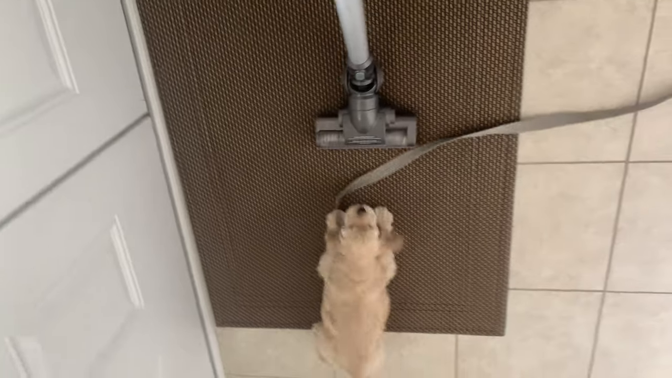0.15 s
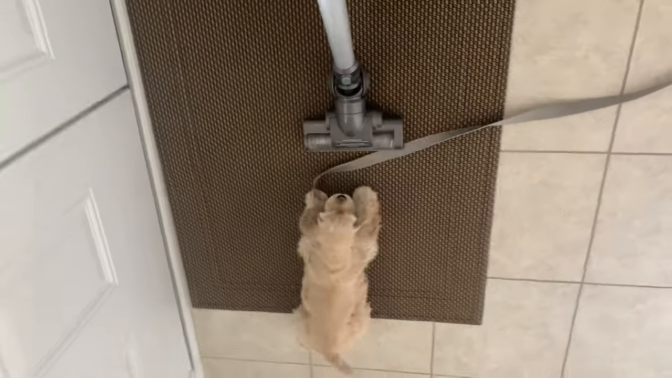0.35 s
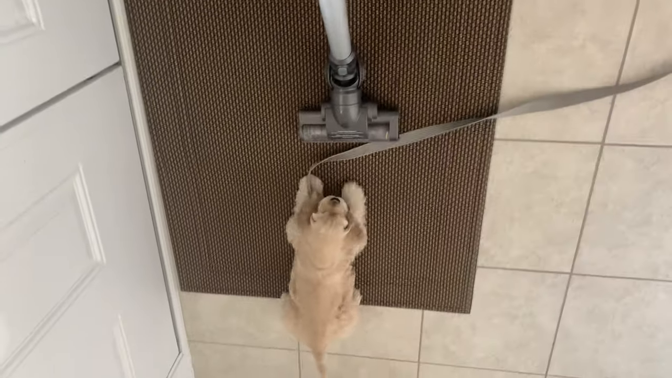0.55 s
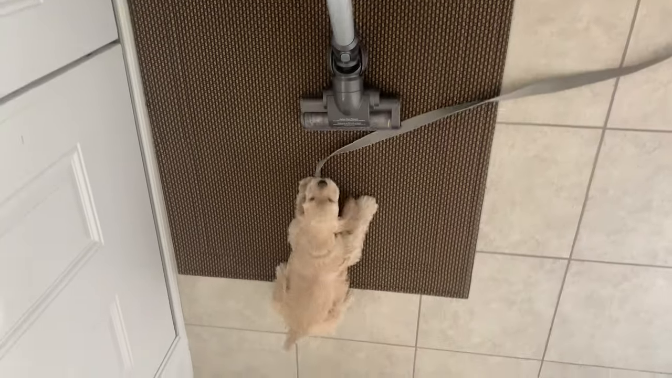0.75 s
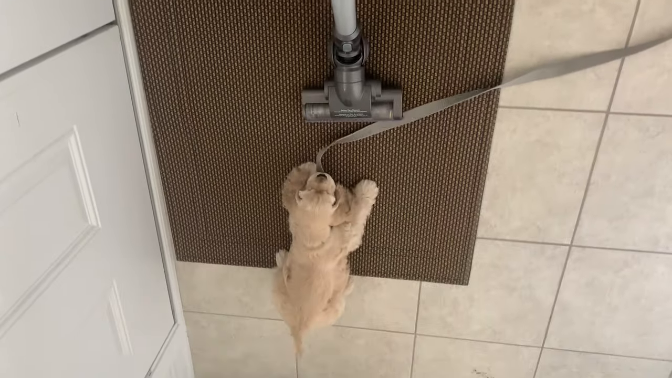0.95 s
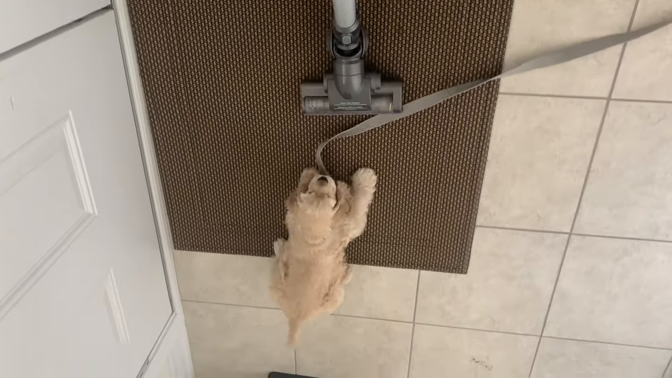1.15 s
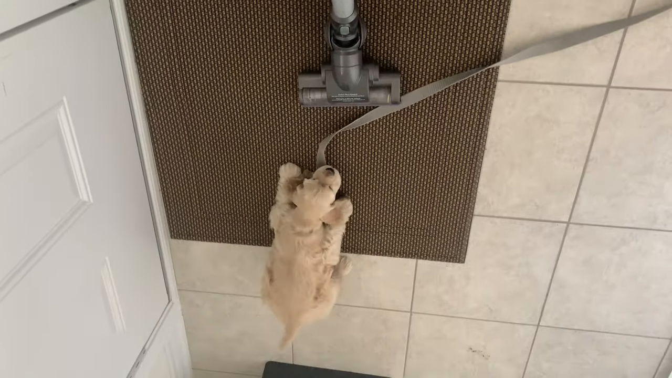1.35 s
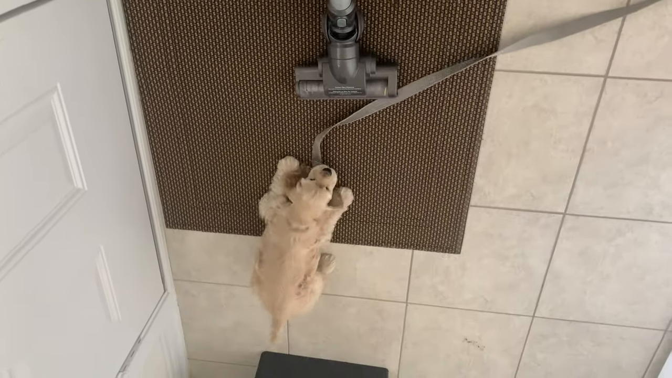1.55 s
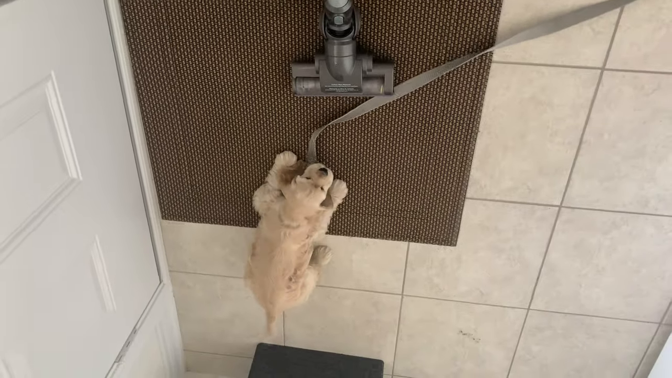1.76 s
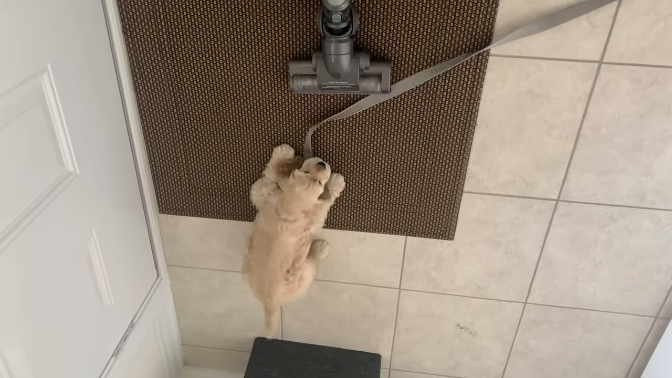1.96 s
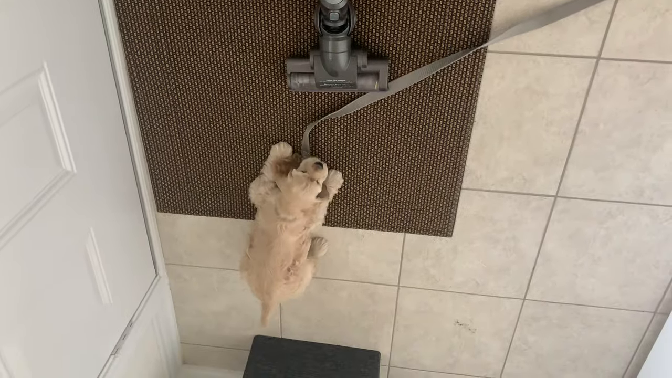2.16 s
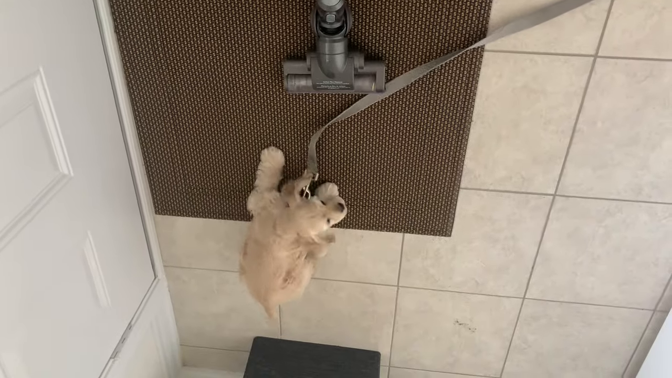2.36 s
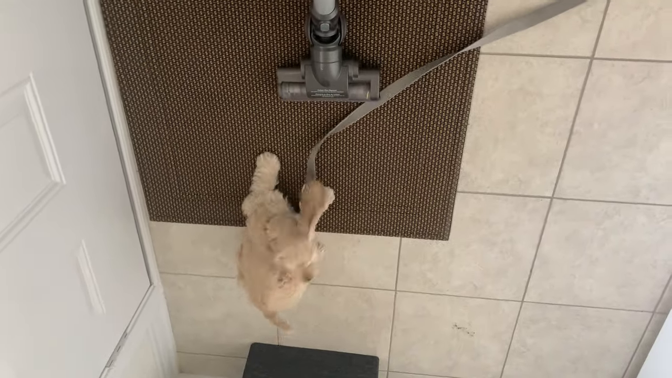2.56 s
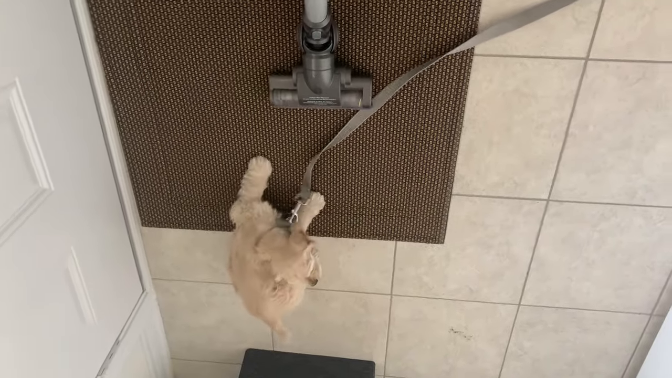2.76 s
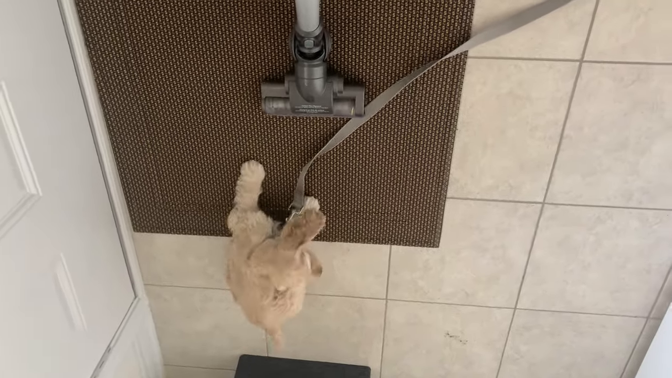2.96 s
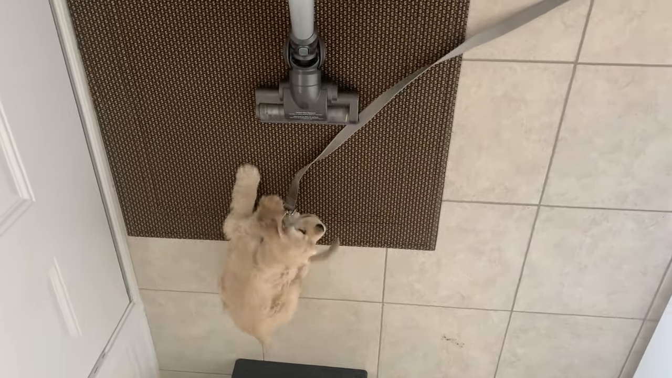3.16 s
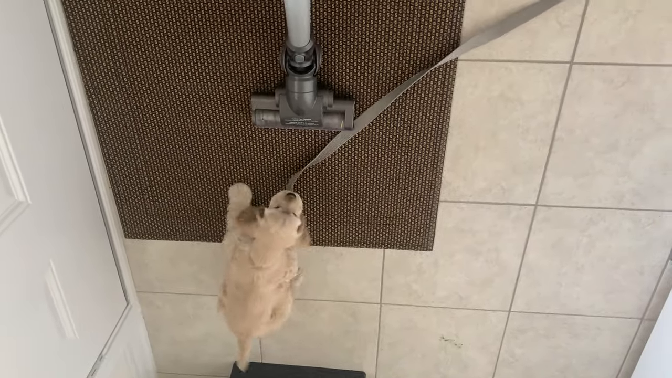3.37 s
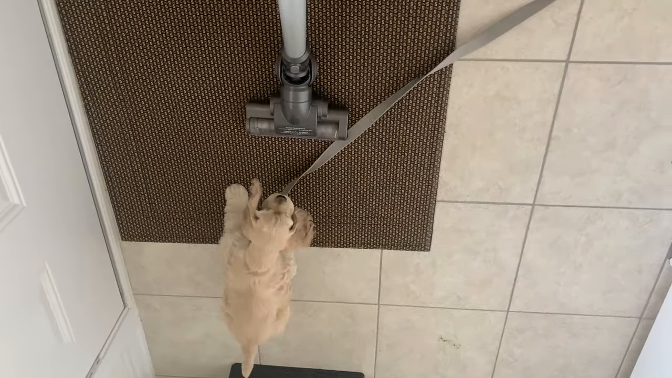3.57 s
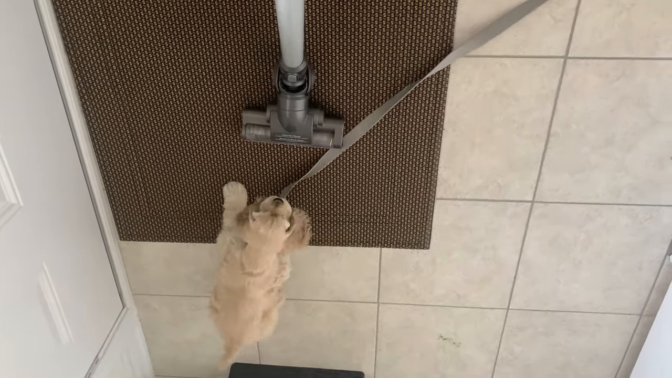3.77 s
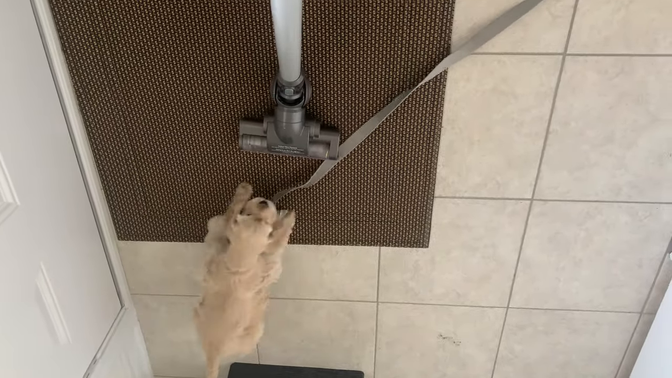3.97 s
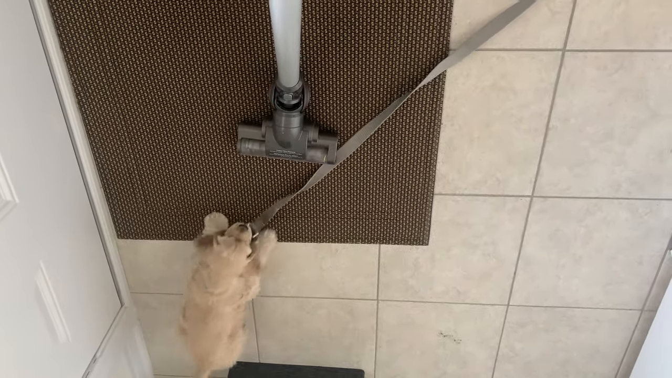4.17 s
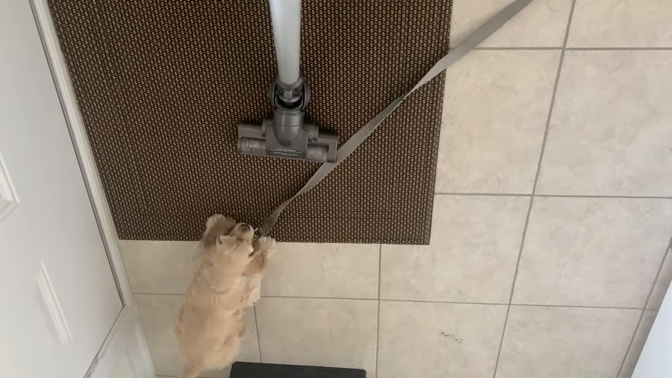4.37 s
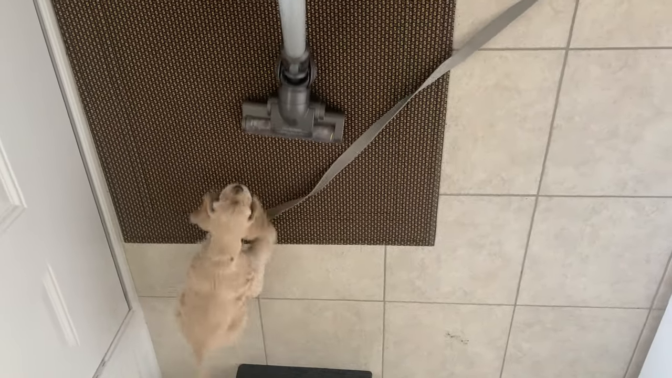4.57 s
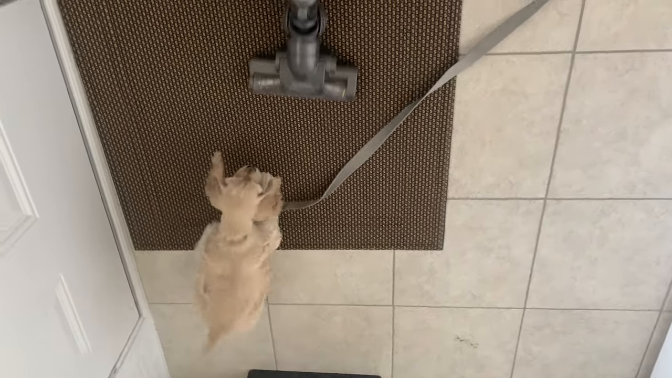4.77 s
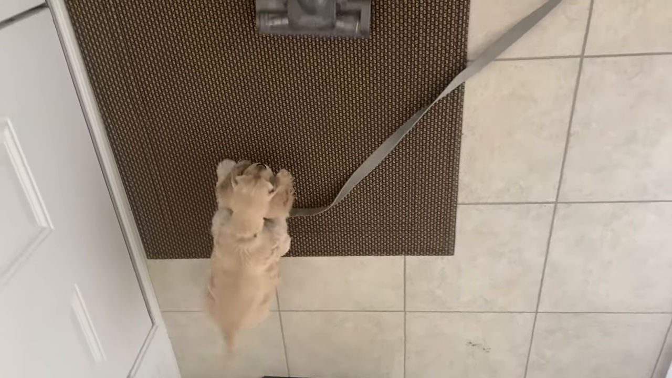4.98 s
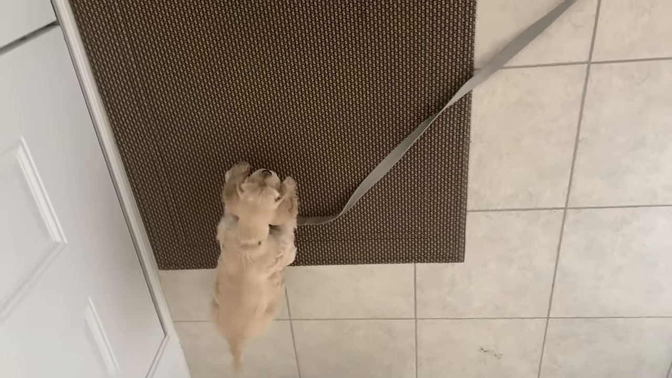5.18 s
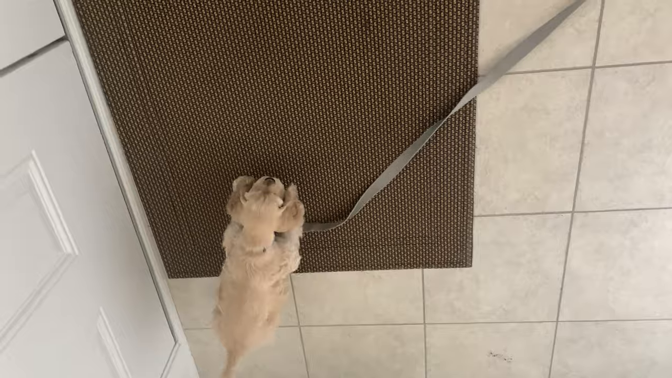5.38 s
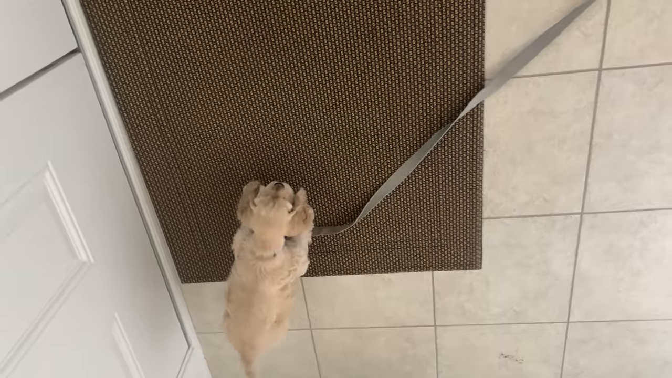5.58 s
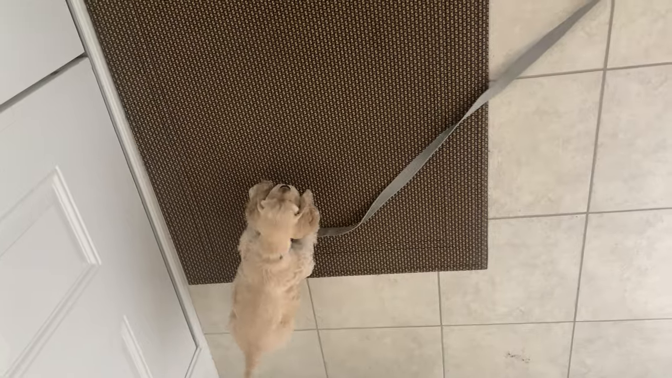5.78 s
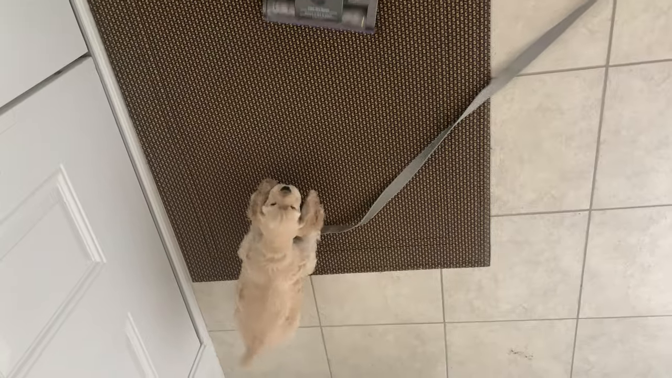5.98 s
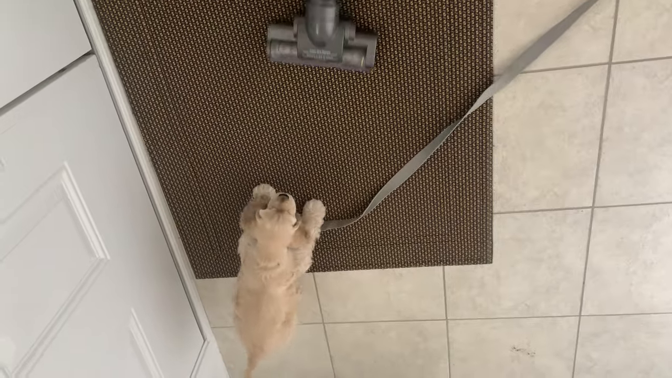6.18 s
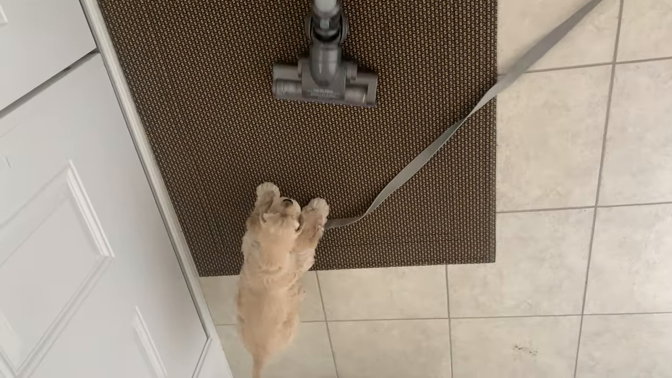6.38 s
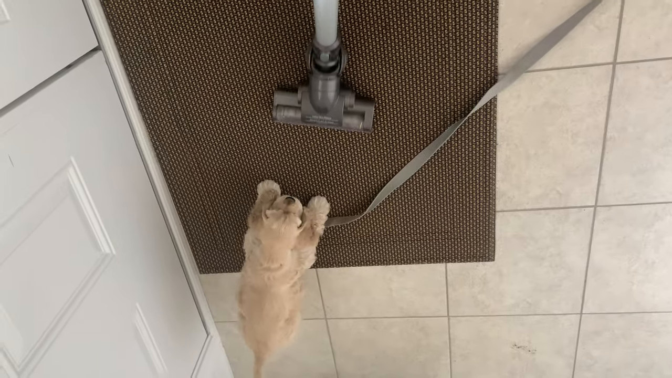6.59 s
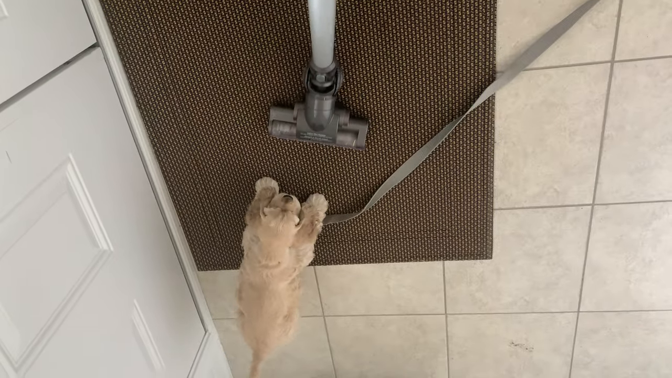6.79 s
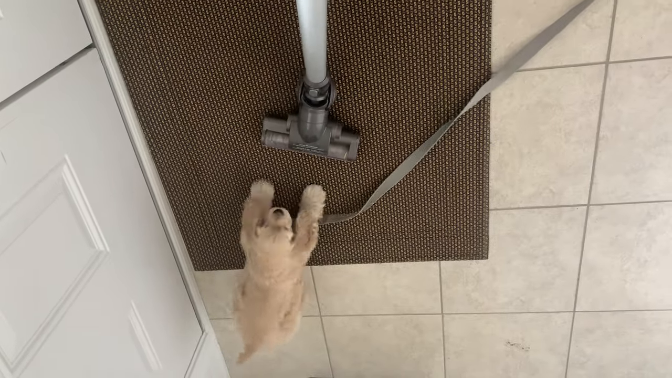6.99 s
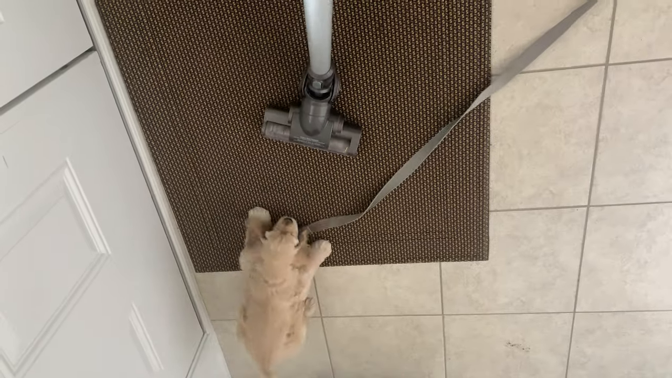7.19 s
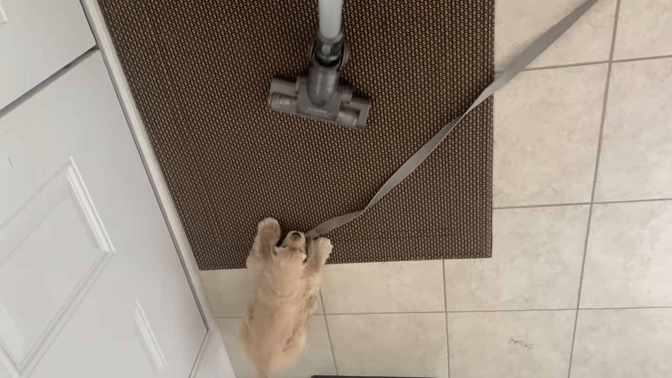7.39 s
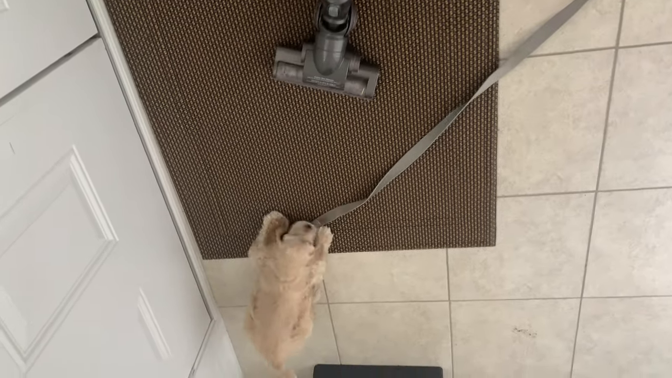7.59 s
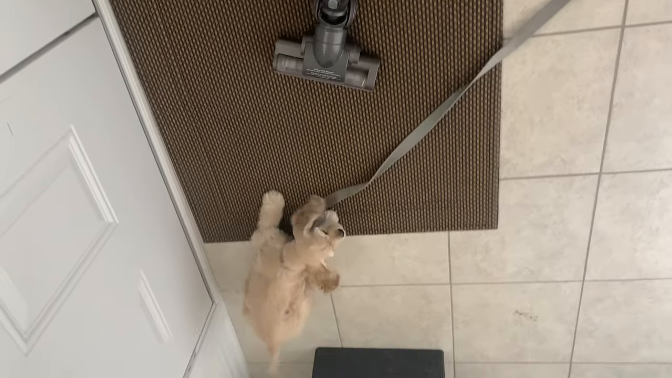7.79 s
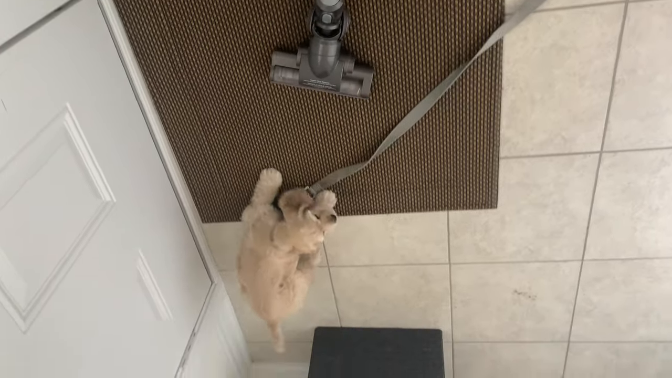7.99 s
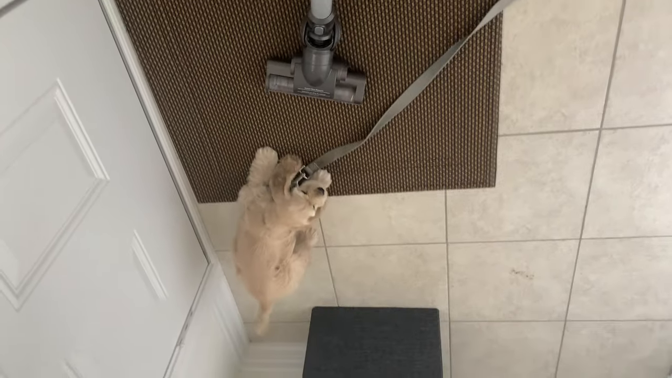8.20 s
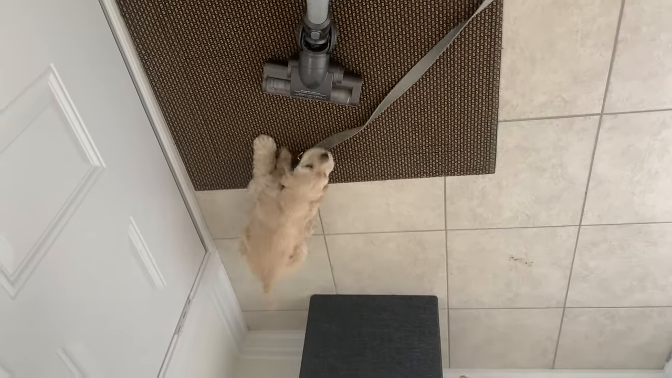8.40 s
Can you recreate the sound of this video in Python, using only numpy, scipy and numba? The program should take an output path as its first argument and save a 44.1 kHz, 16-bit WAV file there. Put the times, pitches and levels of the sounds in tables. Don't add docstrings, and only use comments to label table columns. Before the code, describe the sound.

From start to end a vacuum cleaner runs in a small, hard tiled hallway: a broad turbulent roar with strong bright hiss, a thin steady motor whine near 1.1 kHz with fainter overtones, a lower brush hum and slight wheel rumble. Its level wavers, strongest around 4 to 4.5 s, dropping near 4.8 and 5.5 s, swelling again at 7 s, dipping by 7.8 s, then rising. Over it a puppy gives single hoarse yaps, each under about 0.2 s, rising quickly to about 1 kHz and falling, with raspy breath and a short bright echo. They come at about 0.2, 0.75, 1.3, 2.3, 3.2, 3.9 and 4.5 s, then a pause with only the cleaner, then 6.0, 7.05, 7.7 and a last, cut-off one at 8.4 s. Phone microphone, stereo, mildly compressed on barks.

```python
import sys
import numpy as np
from scipy import signal
from scipy.fft import rfft, irfft
from scipy.io import wavfile
from scipy.ndimage import uniform_filter1d
from numba import njit

SR = 44100
rng = np.random.default_rng(int(sys.argv[2]) if len(sys.argv) > 2 else 0)


def to_wav(s):
    ch = np.atleast_2d(s).T
    pcm = np.round(np.clip(ch, -1, 1) * 32767)
    wavfile.write(sys.argv[1], SR, pcm.astype(np.int16))


def rack_gain(trim_db):
    fader = np.asarray(trim_db, float)
    return 10 ** (fader / 20)


N = 372204
TIME = np.arange(N) / SR
HZ = np.fft.rfftfreq(N, 1 / SR)
MIDDLE_DB = -36


def over_hz(table):
    hz, value = np.transpose(table)
    return np.interp(np.log(HZ + 1), np.log(hz), value)


def unit(x):
    return x / np.sqrt(np.mean(x ** 2))


def walk(rate):
    hold = int(SR / rate)
    steps = np.repeat(rng.standard_normal(N // hold + 1), hold)
    return unit(uniform_filter1d(uniform_filter1d(steps, hold), hold)[:N])


@njit
def band(x, hz, width):
    y, b, l = np.empty(len(x)), 0., 0.
    for i in range(len(x)):
        g, k = np.tan(np.pi * hz[i] / SR), width / hz[i]
        v = (b + g * (x[i] - l)) / (1 + g * (g + k))
        b, l, y[i] = 2 * v - b, l + 2 * g * v, k * v
    return y


def twice(x, hz, width_hz):
    centre_hz = hz + np.zeros(N)
    return band(band(x, centre_hz, 1. * width_hz), centre_hz, 1. * width_hz)


def nearness():
    # (time [s], jet hiss level [dB], nozzle turned to the phone [dB])
    path = [(0.0, -38, 0.7), (0.65, -36, 1.3), (0.94, -39, -0.5), (1.08, -35.5, 0.3), (1.69, -37, 0.1),
            (3.69, -34.5, -0.8), (4.18, -33.5, 0.3), (4.47, -33, -1), (4.79, -40, 1), (4.84, -36.5, -2.5),
            (5.55, -40, -4.6), (7.08, -33.5, 0.6), (7.76, -38.5, 2.2), (8.44, -35, -2.5)]
    s, hiss_db, turn_db = np.transpose(path)
    return np.interp(TIME, s, hiss_db) - MIDDLE_DB, np.interp(TIME, s, turn_db)


def air(levels_db):
    # (frequency [Hz], density [dB per Hz])
    flow_spectrum = [(25, -50), (80, -51), (130, -14), (210, -4.5), (300, -4.5), (400, 0.5), (520, -2.5),
                     (800, 1), (1300, 1.5), (2000, 0), (2700, 2), (3350, 5.5), (3800, 0.5), (4250, -7),
                     (4700, -7), (5400, 4.5), (6400, -1.5), (7300, -5), (8200, -1.5), (9100, 2), (10200, -2),
                (11500, -7.5), (12300, -5.5), (13500, -5), (15000, -9.5), (16500, -13)]
    flicker_db, half_octave = 1.67, np.log(2) / 2
    centres = np.log([280, 1400, 6300, 11000])
    spectrum = rfft(rng.standard_normal(N)) * rack_gain(over_hz(flow_spectrum))
    out = 0
    for place in np.log(40) + half_octave * np.arange(19):
        window = np.clip(1 - abs(np.log(HZ + 1) - place) / half_octave, 0, 1)
        share = [np.interp(place, centres, row) for row in np.eye(4)]
        band_db = np.dot(share, levels_db) + flicker_db * walk(9)
        out = out + rack_gain(band_db) * irfft(spectrum * window, N)
    return out


def whine():
    # (time [s], whine fundamental [Hz])
    motor_speed = [
        (0, 1132.5),
        (3.9, 1132.5),
        (4.3, 1126),
        (5.6, 1127),
        (6.6, 1130),
        (7.0, 1132.5),
        (7.4, 1127),
        (8.44, 1128),
    ]
    # (multiple of the fundamental [1], level [dB])
    motor_orders = [(1, -50), (2, -57), (3, -60), (4, -59), (5, -56), (6, -59), (7, -54), (8, -55),
                    (9, -54), (12, -60), (13, -60)]
    # (frequency [Hz], level [dB])
    brush_partials = [
        (732, -50),
        (1462, -59),
        (2192, -62),
    ]
    # (time [s], motor hum level [dB], brush level [dB])
    facing = [
        (0, -6, -4),
        (1.4, -6, 1),
        (2.8, 4, 3),
        (4.4, 5, 1),
        (5.0, 0, -4),
        (5.85, 5, -5),
        (7.0, 3, -5),
        (8.44, -3, -6),
    ]
    s, *columns = np.transpose(facing)
    hum_db, brush_db = (np.interp(TIME, s, column) for column in columns)
    whistle_db = 3 + 0.95 * nearness()[0]
    motor_hz = np.interp(TIME, *np.transpose(motor_speed)) * (1 + .001 * walk(8))
    phase = 2 * np.pi * np.cumsum(motor_hz) / SR
    tones = np.zeros(N)
    for k, db in motor_orders:
        tone_db = db + (hum_db if k < 3 else whistle_db) + 2.5 * walk(4)
        tones = tones + rack_gain(tone_db) * np.sin(k * phase + 2 * np.pi * rng.random())
    for hz, db in brush_partials:
        tones = tones + rack_gain(db + brush_db + 2.5 * walk(4)) * np.sin(2 * np.pi * hz * TIME)
    return np.sqrt(2) * tones


def nozzle(near_db):
    slot_hz, width_hz = 7300, 1500
    return unit(twice(rng.standard_normal(N), slot_hz, width_hz)) * rack_gain(-44.5 + 3.8 * near_db)


def wheels():
    floor_hz, width_hz = 74, 130
    rumble = twice(twice(rng.standard_normal(N), floor_hz, width_hz), floor_hz, width_hz)
    bumps_per_s = 6
    return unit(rumble) * rack_gain(-62 + 2.5 * walk(bumps_per_s))


def yap_controls():
    # (start [s], rise [s], top pitch [Hz], throat level [dB], mouth level [dB])
    yap_table = [(.19, 0.02972, 927.4, -19.5, -18.5), (.742, .046, 985, -13.5, -24.5),
                 (1.28, .04, 951.2, -18.5, -18), (2.272, .04, 1124, -13.5, -18),
                 (3.222, .065, 1134, -17, -21), (3.91, .055, 1000, -19.5, -19),
                 (4.503, .042, 1122, -14.5, -22), (6.01, .052, 1149, -15.5, -21),
                 (7.04, .06, 1154, -15.5, -22), (7.672, .06, 1181, -12, -23),
                 (8.38, .07, 1124, -14.5, -18.5)]
    shoulder, jaw_open, knee, jaw_shuts = .55, .68, 1 + 0.25, 1 + 0.38
    out, voiced = np.zeros((6, N)), np.zeros(N)
    for k, (s, rise, top_hz, throat_db, mouth_db) in enumerate(yap_table):
        end = s + rise + .09 + .1 * (top_hz - 1000) / 1000
        stage = np.interp(TIME, [s, s + rise, end], [0, 1, 2])
        pitch_hz = np.interp(stage, [0, shoulder, 1, 2], [674.3, 897, top_hz, 742.7])
        effort = [throat_db - 21, throat_db - 12, throat_db, mouth_db - 16.5, mouth_db - 9]
        effort_db = np.interp(stage, [0, shoulder, 1, knee, 2], effort)
        jaw_db = mouth_db + np.interp(stage, [0, jaw_open, jaw_shuts, 2], [-22.5, -4.5, 0, -12])
        top_db = 0.8 * (throat_db - mouth_db) + np.interp(stage, [0, 1, 2], [-10.5, -6.5, -44])
        mouth_hz = np.interp(stage, [0, 1, jaw_shuts, 2], [2100, 2520, 1750, 1550])
        rough = np.interp(stage, [0, 1, 2], [.58, .36, .66])
        shape = [pitch_hz, effort_db, jaw_db, top_db, mouth_hz, rough]
        out = np.where(TIME > s - .1 if k else True, shape, out)
        voiced = voiced + (TIME > s) * (TIME < end)
    return (*out, voiced)


def puppy():
    hz, effort_db, jaw_db, top_db, mouth_hz, rough, voiced = yap_controls()
    rough = np.clip(rough + .03, .25, .9)
    phase = 2 * np.pi * np.cumsum(hz * (1 + .16 * rough * walk(300))) / SR
    puff = np.exp(6.0 * (np.cos(phase) - 1)) * (1 + .8 * rough * np.cos(phase / 2))
    folds = unit(puff - np.mean(puff)) * rack_gain(7.0 * rough * walk(250))
    breath = unit((0.43 + puff) * rng.standard_normal(N))
    folds = np.sqrt(1 - rough ** 2) * folds
    breath = 2.5 * rough * breath
    glottis = folds + breath
    throat_hz, throat_width_hz = 270 + 0.47 * hz, 800
    windpipe_hz, windpipe_width_hz = 1150, 1500
    low = twice(folds, throat_hz, throat_width_hz) + twice(breath, windpipe_hz, windpipe_width_hz)
    top_ring_hz, top_ring_width_hz = 3450, 900
    top = twice(glottis, top_ring_hz, top_ring_width_hz)
    mouth_width_hz = 980
    mouth = twice(glottis, mouth_hz, mouth_width_hz)
    sound = rack_gain(effort_db) * low + rack_gain(jaw_db - 0.5) * (rack_gain(top_db + 3) * top - mouth)
    sound = signal.sosfilt(signal.butter(4, [613, 4000], "band", fs=SR, output="sos"), sound)
    return sound * uniform_filter1d(1. * voiced, size=200)


def hallway(x):
    # (frequency [Hz], level [dB], decay time T60 [s])
    hall_modes = [
        (691, -21, .4),
        (977, -28, .4),
    ]
    hall_t60_s, treble_t60_s, late_t60_s = .52, .44, 1.0
    t = TIME[:SR]
    dense = rng.standard_normal(SR)
    dull = signal.sosfilt(signal.butter(2, 1500, fs=SR, output="sos"), dense)
    echoes = dull * rack_gain(-60 * t / hall_t60_s) + (dense - dull) * rack_gain(-60 * t / treble_t60_s)
    echoes = echoes + dull * rack_gain(-18 - 60 * t / late_t60_s)
    echoes = echoes * np.clip(t / 0.0013, 0, 1)
    echoes = echoes / np.sqrt(np.sum(echoes ** 2))
    for hz, db, t60 in hall_modes:
        echoes = echoes + .050 * rack_gain(db - 60 * t / t60) * np.sin(2 * np.pi * (hz * t + rng.random()))
    return rack_gain(-2) * signal.fftconvolve(x, echoes)[:N]


def ports(one, other, lead, alike, tilt):
    # (frequency [Hz], level difference [dB])
    port_tilt = [(60, 0), (200, 1), (400, 0), (1000, -3.5), (2400, -1), (3500, 1), (4400, 0)]
    turn = np.exp(.5j * np.interp(HZ, *np.transpose(lead))) * rack_gain(tilt * over_hz(port_tilt) / 2)
    common = np.sqrt((1 + alike) / 2) * rfft(one)
    apart = np.sqrt((1 - alike) / 2) * rfft(other)
    return np.array([irfft((common + apart) * turn, N), irfft((common - apart) / turn, N)])


def scene():
    # (frequency [Hz], phase [rad])
    lead_cleaner = [(0, 0), (1000, -.9), (1500, -.3), (2000, 1.3), (2700, 2.6), (3700, 1.3), (4200, 1.8),
                    (4450, 2.9), (4750, 3.25), (22050, 28.4)]
    # (frequency [Hz], phase [rad])
    lead_puppy = [(0, 0), (1300, -.7), (2000, .3), (3000, 1.2), (4050, 1.9), (4450, 3.0), (4750, 3.25),
                  (22050, 28.4)]
    # (frequency [Hz], share [0-1])
    common_share = [(60, .995), (250, .95), (600, .75), (1100, .4), (1900, .45), (2600, .7), (4800, .88),
                    (6500, .985)]
    near_db, turn_db = nearness()
    rumble_db = -48.5 + 13.5 + 0.56 * near_db
    roar_db = -36.5 + 0.82 * near_db
    jet_db = MIDDLE_DB + 1.5 + near_db
    top_hiss_db = jet_db - 3.5 + turn_db + 6.0
    levels_db = 31 - 22 + np.array([rumble_db, roar_db, jet_db, top_hiss_db])
    alike = np.clip(over_hz(common_share), 0, 1)
    cleaner = ports(air(levels_db) + whine() + nozzle(near_db), air(levels_db), lead_cleaner, alike, 1)
    floor = wheels()
    yaps = puppy()
    direct = ports(yaps, yaps, lead_puppy, 1, 1.0)
    walls = ports(hallway(yaps), hallway(yaps), lead_puppy, alike, 0.13)
    return cleaner + floor + rack_gain(8.0) * (direct + walls)


def band_limit(x):
    return signal.sosfilt(signal.butter(12, 16660, fs=SR, output="sos"), x)


def record(dry):
    release_s, above_db, slope = 0.36, -16, 0.75
    keep = np.exp(-1 / (release_s * SR))
    power = signal.lfilter([1 - keep], [1, -keep], np.mean(dry ** 2, axis=0))
    loud_db = 10 * np.log10(power + 1e-12)
    ducked = dry * rack_gain(-slope * np.maximum(loud_db - above_db, 0))
    rounded = np.tanh(1.05 * ducked) / 1.05
    top_hz = 15700
    mix = signal.sosfilt(signal.ellip(10, .2, 80, top_hz, fs=SR, output="sos"), rounded)
    return band_limit(mix)


dry = scene()
out = record(dry)
to_wav(out)
```